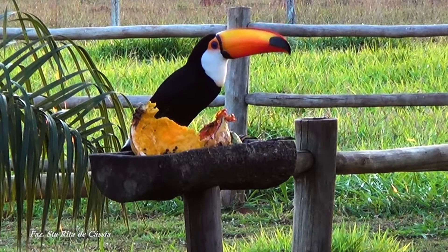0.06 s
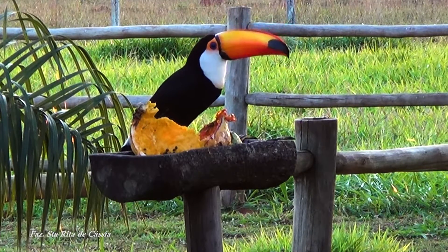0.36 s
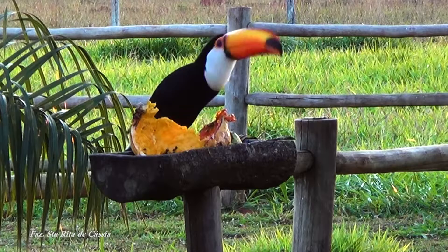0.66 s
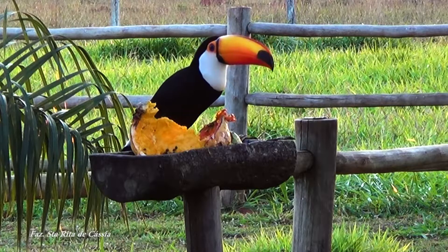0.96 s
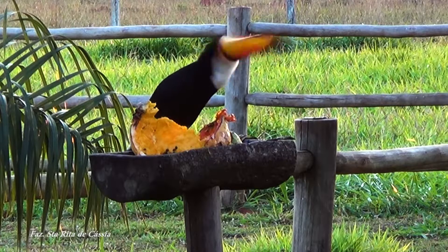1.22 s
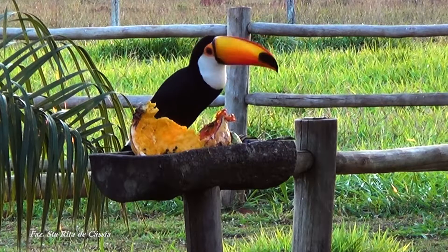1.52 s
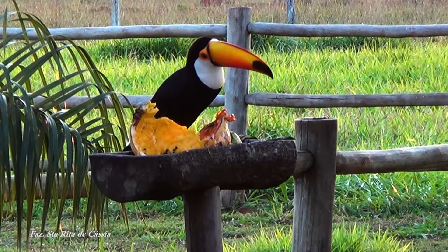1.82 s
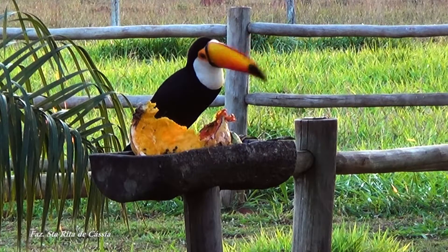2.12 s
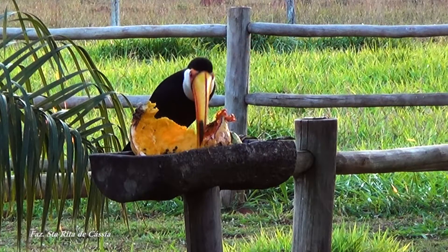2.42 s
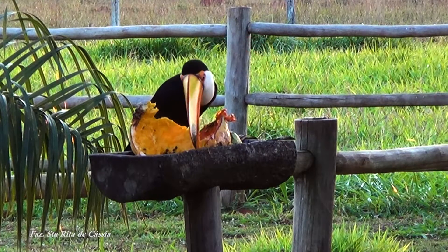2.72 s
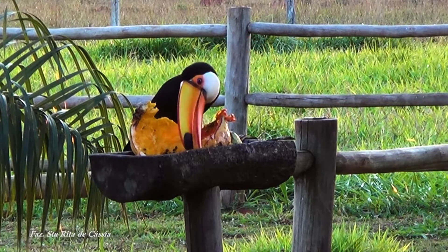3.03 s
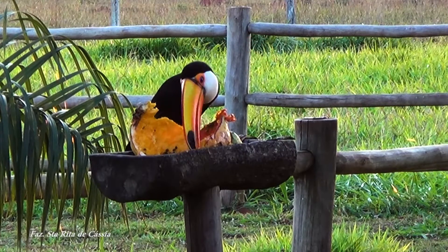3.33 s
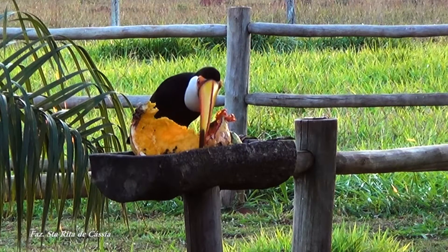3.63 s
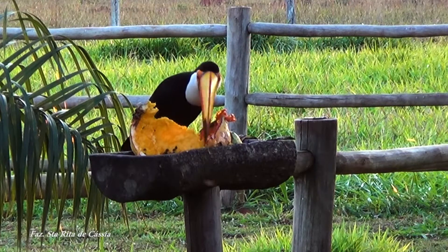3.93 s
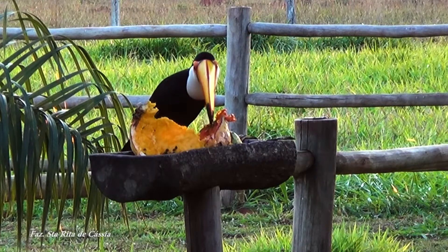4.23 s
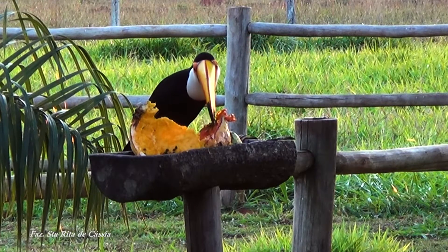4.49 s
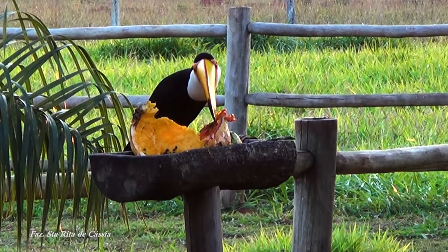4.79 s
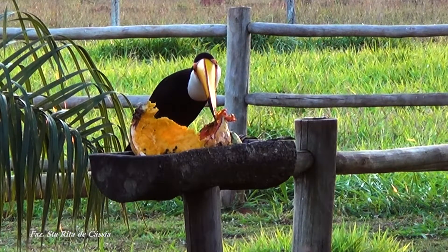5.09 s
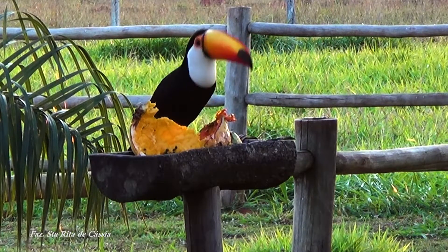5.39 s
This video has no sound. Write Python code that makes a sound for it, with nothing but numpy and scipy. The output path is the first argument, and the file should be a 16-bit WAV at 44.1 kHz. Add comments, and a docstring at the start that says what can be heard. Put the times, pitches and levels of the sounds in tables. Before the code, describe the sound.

A toucan croaks in short, irregular rattles close by, with a fading screech and light beak taps over soft outdoor hiss.

```python
"""Toucans croak at a farm-yard feeder, close to the microphone: each call is a slowing rattle of short
tone bursts with a throat rasp in between. A parrot-like screech dies away at the start, over soft
open-air hiss and a faint distant chorus. A small bird lisps, a far bird yelps, insects sing and a beak
picks at the fruit. Fences and trees throw back a short scatter and a long faint tail."""
import sys
import numpy as np
from scipy import signal
from scipy.fft import rfft, irfft, next_fast_len
from scipy.io import wavfile

SR = 44100
rng = np.random.default_rng(int(sys.argv[2]) if len(sys.argv) > 2 else 0)


def dump_mix(stems):
    """Bounce the given channels to the path in sys.argv[1] as a 16-bit WAV at rate SR."""
    frames = np.atleast_2d(stems).T  # one column per channel
    limited = np.clip(frames, -1, 1)  # hard clip at full scale
    pcm = np.round(limited * 32767).astype(np.int16)
    wavfile.write(sys.argv[1], SR, pcm)


N = 244755
T = np.arange(N) / SR


def undb(db):
    """Decibels to gain."""
    return 10 ** (np.asarray(db) / 20)


def unit(x):
    """Scale to rms 1."""
    return x / np.sqrt(np.mean(x ** 2))


def curves(table):
    """The columns of a table, joined by straight lines in time."""
    times, *columns = np.transpose(table)
    return [np.interp(T, times, column) for column in columns]


def colour(x, points):
    """Filter by a spectrum of (f/Hz, gain/dB) points."""
    hz, db = np.transpose(points)
    size = next_fast_len(x.shape[-1])
    f = np.maximum(np.arange(size // 2 + 1) * SR / size, 1)
    gain = undb(np.interp(np.log(f), np.log(hz), db))
    return irfft(rfft(x, size) * gain, size)[..., :x.shape[-1]]


def stereo_noise(points, width, size=N):
    """Coloured noise whose side share depends on frequency."""
    mid, side = colour(rng.standard_normal((2, size)), points)
    side = colour(side, width)
    return unit(np.array([mid + side, mid - side]))


def walk(rate_hz):
    """Smooth random motion, rms 1."""
    lowpass = signal.butter(2, min(rate_hz, SR / 20), fs=SR / 8, output="sos")
    smooth = signal.sosfilt(lowpass, rng.standard_normal(N // 8))
    return unit(np.interp(np.arange(N), np.linspace(0, N, len(smooth)), smooth))


def turn(hz):
    """Phase of a moving frequency."""
    return 2 * np.pi * np.cumsum(hz) / SR


def band(hz, width_hz):
    """Noise ringing in one moving resonance, rms 1."""
    phase = turn(hz + np.zeros(N))
    return walk(width_hz / 2) * np.cos(phase) + walk(width_hz / 2) * np.sin(phase)


def bell(t, width):
    """A smooth swell around t = 0."""
    return np.exp(-(t / width) ** 2 / 2)


def fade(db_per_s, hold_s, release_db_per_s):
    """Level in dB that sinks steadily, and faster once the hold is over."""
    return -db_per_s * T - release_db_per_s * np.maximum(T - hold_s, 0)


def add(out, start_s, x):
    """Mix in a short sound."""
    i = int(start_s * SR)
    out[i:i + len(x)] += x[:N - i]


# Stereo width of the open air at the microphone: f/Hz, side minus mid/dB
OPEN_WIDTH = [(400, -3), (900, -8.5), (2300, -5.5), (4300, -1), (8000, 1.5)]


def yard(x, near_db, far_db, near_t60=0.11, far_t60=1.0, leaf_blur_hz=45):
    """Echoes only: quick scatter off trough and fence, then a tail from the trees, blurred by leaves."""
    t, x = T[:SR], np.atleast_2d(x)
    fence_colour = [(400, -15), (1500, -2.5), (4000, 7), (12000, -21)]
    fence_width = [(1500, -9), (4000, -7.5), (8000, -11)]
    tree_colour = [(400, -12.5), (1700, -5.5), (2500, -1.5), (3300, -2.5), (4500, -4), (7000, -1),
                   (12000, -21)]
    fence = stereo_noise(fence_colour, fence_width, SR) * undb(-60 * t / near_t60) * (t > .004)
    trees = stereo_noise(tree_colour, OPEN_WIDTH, SR) * undb(-60 * t / far_t60)
    trees *= 1 - np.exp(-t / 0.016)
    analytic = signal.hilbert(x, next_fast_len(N))[:, :N]
    blurred = np.real(analytic * np.exp(1j * turn(leaf_blur_hz * walk(leaf_blur_hz))))
    near = undb(near_db) * signal.fftconvolve(x, unit(fence), axes=1)
    far = undb(far_db) * signal.fftconvolve(blurred, unit(trees), axes=1)
    return (near + far)[:, :N] / np.sqrt(SR)


# The parrot's lower voice: t/s, f/Hz, level/dB, share of clean tone/0-1
LOWER_VOICE = [(0, 3753, -26.5, 0.8), (0.07, 3915, -36.5, 0.07), (.14, 3570, -38.5, 0.1),
               (0.231, 3410, -42, 0.26), (0.261, 3818, -32.5, 0.6), (0.318, 3773, -33, 0.48),
               (.345, 3605, -38.5, 1), (0.374, 3611, -31.5, 1), (.392, 3350, -52, 0),
               (0.561, 3440, -62, 0.3)]
# Swell of its hoarse hiss: t/s, level/dB
HISS_SWELL = [(0, -61), (.1, -53.5), (.28, -56), (.4, -39.5), (.51, -39), (.66, -52), (.87, -62)]
# Spectra of the body and the treble edge of that hiss: f/Hz, level/dB
HISS_BODY = [(600, -59), (1400, -4.5), (2050, 1.5), (2500, 9), (3300, 5), (4500, -10.5), (5800, -23.5),
             (7000, -47.5)]
HISS_EDGE = [(4000, -45), (5800, 9), (6500, -2), (7100, 1.5), (8000, -3), (8600, -4), (10200, -7.5),
             (11200, -19.5), (13000, -47.5)]


def screech(start_hz=4593, top_hz=5800, rise_s=0.22):
    """A parrot's two rough voices slide apart over a hoarse hiss and echo from the trees."""
    high_hz = top_hz + (start_hz - top_hz) * np.exp(-T / rise_s)
    high_db = -25.5 + fade(53.5, hold_s=0.17, release_db_per_s=103)
    high_tone = np.sin(turn(high_hz * (1 + 0.005 * walk(110))))
    high = undb(high_db) * (high_tone + 0.33 * band(high_hz * .93, 800))
    low_hz, low_db, clean = curves(LOWER_VOICE)
    low_db += fade(0, hold_s=LOWER_VOICE[-1][0], release_db_per_s=385)
    low_tone = np.sin(turn(low_hz * (1 + 0.0051 * walk(99))))
    low = undb(low_db) * (clean * low_tone + (1 - clean) * band(low_hz, 520))
    whistle_hz = np.interp(T, [0, .07, .3], [7250, 7920, 8000])
    whistle = undb(high_db - 12.5) * band(whistle_hz, 150) + undb(high_db - 17) * band(6920, 130)
    throat = undb(np.interp(T, [0, .28, .4], [-49, -46, -60])) * (T < .4) * band(2080, 290)

    body_db, = curves(HISS_SWELL)
    edge_db = -42 + fade(21, hold_s=0.4, release_db_per_s=44.5)
    hiss = undb(body_db + 2.5) * stereo_noise(HISS_BODY, OPEN_WIDTH)
    hiss += undb(edge_db) * stereo_noise(HISS_EDGE, OPEN_WIDTH)
    hiss *= undb(1.1 * walk(40)) * np.clip((1 - T) / 0.091, 0, 1)

    lower, upper = low + throat, high + whistle
    upper_pair = np.array([upper, np.roll(upper, 3)])  # reaches the right side slightly later
    return 0.36 * lower + 0.9 * upper_pair + hiss + yard(lower + upper, near_db=-10, far_db=-10)


# Spectrum of the open air around the yard: f/Hz, level/dB
AIR_SPECTRUM = [(30, -26), (300, -31), (420, -31), (560, -15), (850, -6.5), (1250, 2.5), (1650, 11),
                (2150, 8), (2500, 4), (5200, 2.5), (6500, 7.5), (7500, -7), (10500, -15), (14000, -27)]


def open_air():
    """Soft outdoor hiss on all sides of the microphone, its level drifting slightly."""
    return stereo_noise(AIR_SPECTRUM, OPEN_WIDTH) * undb(-58.5 + .5 * walk(6))


# Faint sounds far beyond the yard: f/Hz, width/Hz, level/dB
DISTANT_BANDS = [(885, 48, -83), (1574, 540, -76), (2055, 51, -69.5)]


def far_chorus():
    """Far-off sounds blur into bands of noise that waver in level and pitch."""
    return sum(undb(db + 3.5 * walk(22)) * band(hz * (1 + 0.018 * walk(4.4)), width_hz)
               for hz, width_hz, db in DISTANT_BANDS)


def croak(start, end, count, hz, sag_hz, peak, tone_db, octave_db, growl_db, growl_hz, rasp_db,
          squeak_db, nasal_hz, nasal_db, rough_db, ring_db, first_db, last_db, swell_db):
    """One row per pulse of a toucan's call: it slows, sags and roughens as the air runs out."""
    gaps = 1 + .35 * np.linspace(0, 1, count - 1) ** 1.5
    progress = np.r_[0, np.cumsum(gaps)] / gaps.sum()
    t = progress * (end - start)
    # one arch of effort lifts pitch and brightness
    effort = np.interp(progress, [0, np.clip(peak, .1, .9), 1], [0, 1, 0])
    slack = 1 - np.sin(np.pi / 2 * effort) ** 2.1
    attack_s, release_s = 0.014, 0.0049
    edges_db = first_db * np.exp(-t / attack_s) + last_db * np.exp((t - t[-1]) / release_s)
    shape_db = edges_db + swell_db * (progress - .5)
    return np.transpose([start + t,
                         tone_db - 1.5 * slack + shape_db,
                         hz - 122 * slack - sag_hz * progress ** 4,
                         octave_db - 9 * slack + shape_db,
                         growl_db - 10 * slack + edges_db,
                         np.full_like(t, growl_hz),
                         rasp_db - 3.5 * slack + edges_db,
                         squeak_db - 6 * slack + edges_db,
                         np.full_like(t, nasal_hz),
                         nasal_db - 7 * slack + edges_db,
                         rough_db + 13.5 * (progress - .5) + edges_db,
                         ring_db + shape_db])


def pulse_clock(times):
    """Time from the nearest pulse, and four random draws for that pulse."""
    nearest = np.searchsorted((times[1:] + times[:-1]) / 2, T)
    return T - times[nearest], rng.standard_normal((len(times), 4))[nearest].T


def resonances(age, modes):
    """Every pulse strikes each resonance into a short swell of wavering tone."""
    out = np.zeros(N)
    for hz, width_s, db in modes:
        phase = 2 * np.pi * hz * (1 + 0.013 * walk(27)) * age + np.pi * walk(30)
        out += undb(db) * bell(age, width_s) * np.sin(phase)
    return out


# Throat squeaks ahead of every pulse: lead/s, width/s, f/Hz, level/dB
THROAT_SQUEAKS = [(0.00872, 0.0015, 5005, -4.5), (.0062, .0012, 4340, -3), (0.0032, 0.002, 3140, 2)]


def squeaks(times, glide_hz_per_s=-120000, pitch_jitter=.03):
    """Short falling tones step down into each pulse, a little different every time."""
    early_s = THROAT_SQUEAKS[1][0]
    age, chance = pulse_clock(times - early_s)
    out = np.zeros(N)
    for (lead_s, width_s, hz, db), luck in zip(THROAT_SQUEAKS, chance):
        t = age - early_s + lead_s
        phase = 2 * np.pi * (hz * (1 + pitch_jitter * luck) + glide_hz_per_s * t / 2) * t
        phase += np.pi * luck + .6 * walk(700)
        out += undb(db - 1.5 + chance[3]) * bell(t, width_s) * np.sin(phase)
    return out


def trough_bounce(x, lag_s=0.001815, db=-14.5):
    """The direct sound plus one reflection off the trough close by."""
    size = next_fast_len(N + SR // 10)
    f = np.arange(size // 2 + 1) * SR / size
    comb = 1 + undb(db) * np.exp(-2j * np.pi * f * lag_s)
    return irfft(rfft(x, size) * comb, size)[..., :N]


# Calls at the feeder: start/s, end/s, pulses/count, top f/Hz, final sag/Hz, peak of effort/0-1,
# tone/dB, octave/dB, growl/dB, growl f/Hz, rasp/dB, squeak/dB, nasal f/Hz, nasal/dB, roughness/dB,
# beak ring/dB, first pulse/dB, last pulse/dB, swell over the call/dB
TOUCAN_CALLS = [(0.386, 0.547, 9, 1734, 43, 0.54, -16.5, -44, -30, 2770, -41, -32.5, 3710, -43.5, -34.5, -43, -14, -10.5, -7),
                (0.9211, 1.087, 10, 1709, 11, 0.93, -16.5, -52, -39, 2770, -46, -42.5, 3236, -41.5, -33.5, -46, -14, 5, -2.5),
                (1.1083, 1.1703, 4, 1640, 10, 0.33, -17, -47, -42, 2550, -50, -51, 3206, -39.5, -35, -42, -2, -1.5, -2),
                (2.2688, 2.434, 10, 1723, 10, 0.85, -16, -24, -34.5, 2650, -43.5, -34, 3673, -35, -53.5, -42.5, -20.5, 0.5, -5),
                (2.9234, 3.0914, 10, 1707, 10.8, 0.7, -16.5, -49.5, -46, 2623, -43, -47, 3497, -37, -38.5, -47, -15, -9.5, 0),
                (3.8236, 3.99, 10, 1780, 132, 0.7, -19, -24.5, -49, 2540, -42, -31.5, 3814, -35.5, -38, -44, -18, -0.5, -3),
                (4.0179, 4.1195, 6, 1682, 55, 0.81, -28, -33.5, -25.5, 2520, -46, -39.5, 3500, -47.5, -31, -41, 3, -9.5, 3),
                (4.8845, 5.0508, 10, 1765, 18, 0.65, -18.5, -23.5, -47, 2694, -40.5, -31.5, 3380, -39.5, -44.5, -48, -20, -6.5, 4)]
# Low resonances of the bird's body: f/Hz, width/s, level/dB
BODY_MODES = [(606, 0.0025, -56), (1120, 0.0032, -36.5)]
# Throat resonances: f/multiple of the call's growl f, width/s, level/dB
THROAT_MODES = [(.475, 0.0027, -20), (.86, .0026, -9), (1, 0.0019, -1.5), (1.27, 0.001, -1)]
# Spectrum of the rasp between pulses: f/Hz, level/dB
RASP_SPECTRUM = [(430, -63.5), (610, -9), (780, -42.5), (1150, -2), (1300, -9.5), (1700, -0.5), (2170, -1),
                 (2450, -23), (2750, 1), (3500, -3.5), (3950, 5.5), (4250, 5.5), (4600, -2.5), (5100, -0.5),
                 (5600, -8), (6300, -8), (7700, -17.5), (14000, -41)]
# Stereo width of the rasp at the microphone: f/Hz, side minus mid/dB
RASP_WIDTH = [(1200, -31), (2300, 2.5), (4300, -19.5), (8000, 1)]


def toucans(burst_s=0.0014, glide_hz_per_s=-19000, skirt=0.051, rasp_lag_s=0.0092):
    """Close by, each pulse swells and fades within a few cycles; the throat rasps in between."""
    pulses = np.vstack([croak(*call) for call in TOUCAN_CALLS])
    (tone_db, hz, octave_db, growl_db, growl_hz, rasp_db, squeak_db,
     nasal_hz, nasal_db, rough_db, ring_db) = curves(pulses)
    age, chance = pulse_clock(pulses[:, 0])
    pitch_hz = hz * (1 + .01 * chance[0])
    phase = 2 * np.pi * (pitch_hz + glide_hz_per_s * age / 2) * age + np.pi * chance[1]
    swell = bell(age + 0.00065, burst_s * np.exp(.13 * chance[2])) + skirt * bell(age, 0.0023)
    tone = undb(tone_db) * (swell / (1 + skirt) * np.sin(phase) + resonances(age, BODY_MODES))
    overtone = np.sin(2.064 * phase) + 0.25 * band(nasal_hz, 650)
    octave = undb(octave_db + chance[3]) * bell(age + 0.00012, 0.001) * overtone
    throat = [(ratio * growl_hz, width_s, db) for ratio, width_s, db in THROAT_MODES]
    growl = undb(growl_db) * resonances(age + 0.000808, throat)
    # the rasp is strongest about halfway from one pulse to the next
    puffs = bell(abs(age) - rasp_lag_s, .0028) + 0.3 * bell(age + 0.0027, 0.004)
    rasp = undb(rasp_db + 2.9 * walk(160)) * puffs * stereo_noise(RASP_SPECTRUM, RASP_WIDTH)
    squeak = undb(squeak_db) * squeaks(pulses[:, 0])
    # a rough voice flutters on after each pulse, so the pulses run together
    flutter = undb(rough_db) * bell(age - 0.0053, 0.0021) * band(.96 * hz, 230)
    flutter = colour(flutter, [(700, -30), (1300, 0)])
    # the hollow beak keeps ringing, with a nasal resonance that differs from call to call
    hollow = undb(tone_db - 28) * band(1640, 280) + undb(ring_db) * band(2140, 110)
    hollow *= bell(age, 0.0058)
    twang = np.sin(2 * np.pi * nasal_hz * (1 + .02 * chance[0]) * age + np.pi * chance[2])
    nasal = undb(nasal_db) * (1.5 * twang * bell(age, .0015) + .68 * band(nasal_hz, 300) * puffs)
    voice = trough_bounce(tone + octave + growl + squeak + rasp + flutter + hollow + nasal)
    return voice + yard(voice, near_db=-12.5, far_db=-17.8, near_t60=.14)


# A small bird out in the yard: t/s, level/dB
LISP_NOTES = [(.79, -62.5), (1.296, -62), (1.64, -64), (1.834, -62), (2.251, -59.5), (2.906, -63.5),
              (3.253, -58.5), (3.502, -57), (3.607, -60.5), (3.793, -55.5), (4.421, -56), (4.691, -57.5),
              (5.054, -58), (5.449, -60)]


def lisps(top_hz=6300, end_hz=5900, length_s=.024):
    """A small bird whistles thin falling notes, faint at the microphone."""
    out, progress = np.zeros(N), np.linspace(0, 1, int(length_s * SR))
    note = np.sin(np.pi * progress) * np.sin(turn(top_hz + (end_hz - top_hz) * progress))
    for start, db in LISP_NOTES:
        add(out, start, undb(db) * note)
    return out + yard(out, near_db=-3.5, far_db=-10.5)


# A bird far from the microphone: t/s, length/s, starting f/Hz, final f/Hz, level/dB
YELP_NOTES = [(1.419, 0.038, 2930, 2150, -52), (1.588, 0.057, 2706, 1980, -53.5),
              (1.736, 0.073, 2770, 2080, -52.5), (1.872, 0.092, 2770, 2098, -52),
              (2.003, 0.089, 2700, 2240, -53.5), (2.133, 0.066, 2910, 2130, -50.5),
              (2.583, 0.032, 2975, 2020, -48)]


def yelps(fall_s=0.015, pip_s=0.011, hold=0.66, octave_db=-9.5, octave_lag_s=0.013):
    """A distant pip drops quickly onto a softer held pitch; a husky octave comes in late."""
    tone, octave, t = np.zeros(N), np.zeros(N), T[:SR // 10]
    pip = np.exp(-(t / pip_s) ** 2)
    for start, length_s, top_hz, end_hz, db in YELP_NOTES:
        phase = turn(end_hz + (top_hz - end_hz) * np.exp(-(t / fall_s) ** 2))
        shape = undb(db) * np.minimum(t / 0.0065, 1) * np.clip((length_s - t) / 0.018, 0, 1)
        add(tone, start, shape * (hold + pip) * np.sin(phase))
        add(octave, start + octave_lag_s, shape * (hold + .7 * pip) * np.sin(2 * phase))
    out = tone * (1 + 0.4 * walk(120)) + undb(octave_db) * octave * (1 + .85 * walk(230))
    return out + yard(out, near_db=-5, far_db=-9, near_t60=0.12)


# Insects in the surrounding meadow: start/s, end/s, f/Hz, width/Hz, throb rate/Hz, level/dB
INSECT_SONGS = [(1.524, 2.1, 7030, 264.6, 64, -69.5), (2.507, 2.919, 7120, 262, 43, -73),
                (3.452, 4.332, 6880, 257, 51, -75), (4.559, 4.884, 6530, 107.6, 34, -62.5),
                (5.312, 5.586, 7120, 256, 42, -69)]


def insects(ramp_s=0.044):
    """Narrow bands of high noise throb on both sides of the microphone."""
    out = np.zeros((2, N))
    for start, end, hz, width_hz, throb_hz, db in INSECT_SONGS:
        singing = np.clip(np.minimum(T - start, end - T) / ramp_s, 0, 1)
        throb = 1 + 0.59 * np.sin(2 * np.pi * throb_hz * (T - start))
        out += undb(db) * singing * throb * np.array([band(hz, width_hz), band(hz, width_hz)])
    return out


# Taps and squelches at the feeder: t/s, level/dB, f/Hz, ring time/s, share of noise/0-1
FRUIT_PECKS = [(1.574, -49.5, 3500, 0.022, 0.32), (3.186, -32, 1650, 0.0074, 1),
               (3.297, -58, 1270, 0.1, 0.68), (3.446, -57, 956, 0.018, 0.76),
               (3.552, -44.5, 2020, 0.021, 0.02), (3.59, -45.5, 1746, 0.049, 0.43),
               (4.586, -49.5, 4490, 0.034, 0.27), (4.716, -49, 1080, 0.048, 0),
               (4.718, -43.5, 3340, 0.022, 0.15), (4.728, -24, 5120, 0.0049, 0.02),
               (4.736, -47.5, 3520, 0.023, 0.4), (4.746, -40.5, 4970, 0.011, 0.1)]


def beak_taps():
    """A beak strikes fruit close by: a damped ring with a wet crackle around its pitch."""
    out, t = np.zeros(N), T[:SR // 10]
    for start, db, hz, ring_s, share in FRUIT_PECKS:
        spectrum = [(hz / 4, -50), (hz / 2, -13), (hz, 0), (hz * 2, -12), (hz * 6, -45)]
        crackle = unit(colour(rng.standard_normal(len(t)), spectrum))
        ring = np.sin(2 * np.pi * hz * t)
        shape = np.minimum(t / 0.0015, 1) ** 2 * undb(db + 4.5 - 60 * t / ring_s)
        add(out, start, shape * ((1 - share) * ring + 0.91 * share * crackle))
    return out + yard(out, near_db=-12.5, far_db=-23)


def scene():
    """The yard from beside the feeder: birds in front, the meadow behind."""
    birds = toucans() + screech() + yelps() + lisps() + beak_taps()
    return birds + open_air() + far_chorus() + insects()


def record(dry):
    """The recorder thins the bass, lifts the treble a little and cuts the very top."""
    thin = colour(dry, [(150, -21.5), (370, -20.5), (550, -3), (10000, 4), (14000, 3)])
    top_hz = 14500
    return signal.sosfilt(signal.ellip(8, .2, 70, top_hz, fs=SR, output="sos"), thin)


dry = scene()
out = record(dry)
dump_mix(out)
```